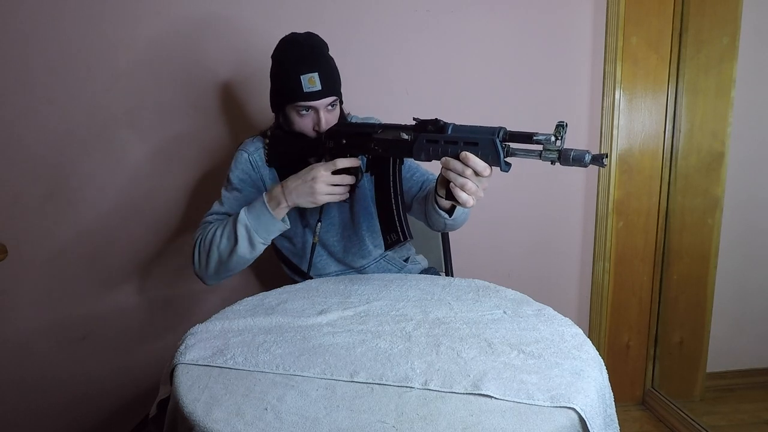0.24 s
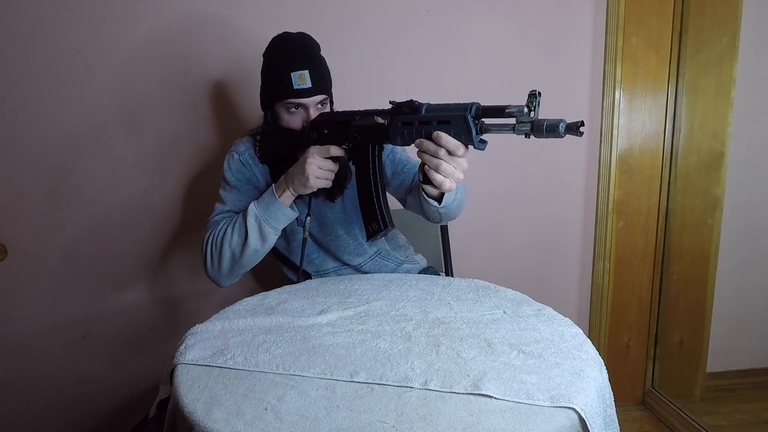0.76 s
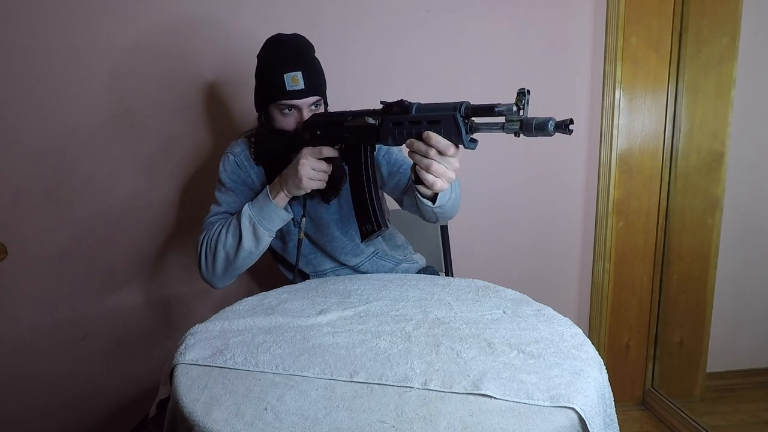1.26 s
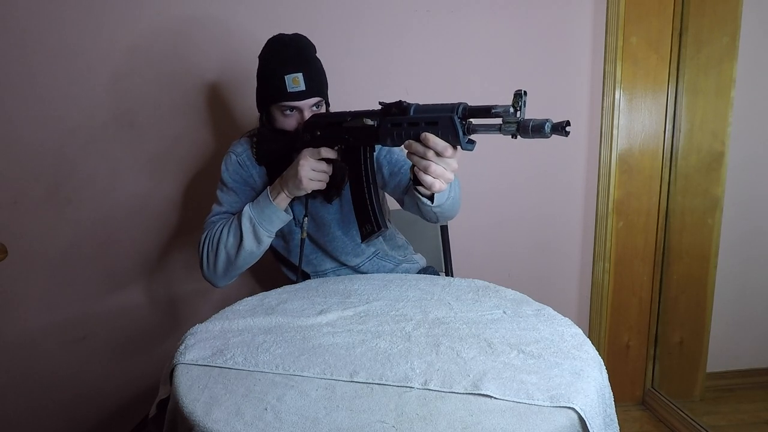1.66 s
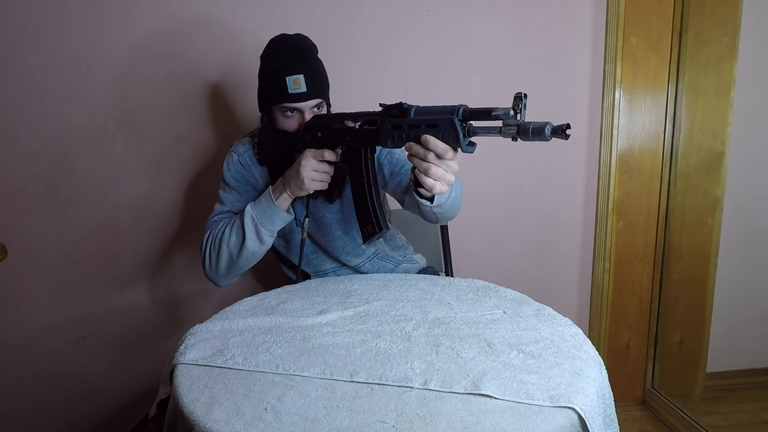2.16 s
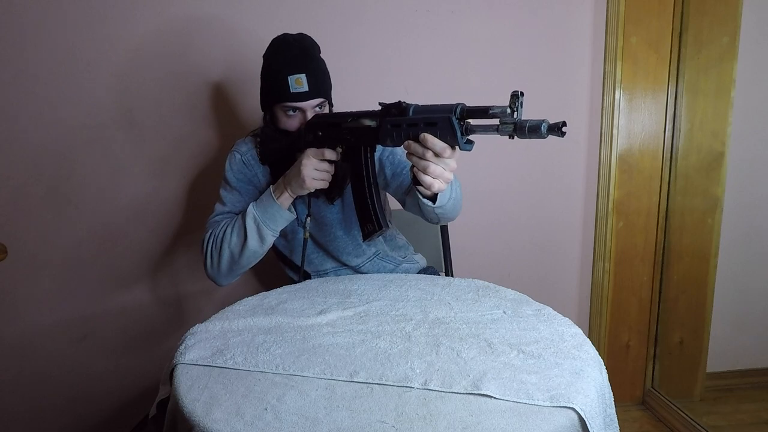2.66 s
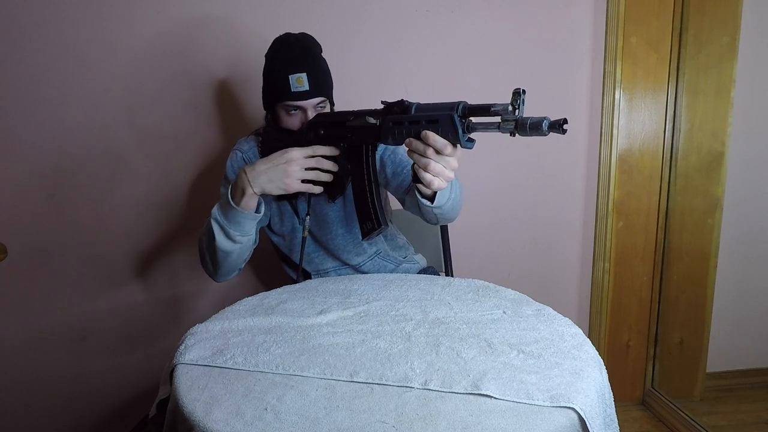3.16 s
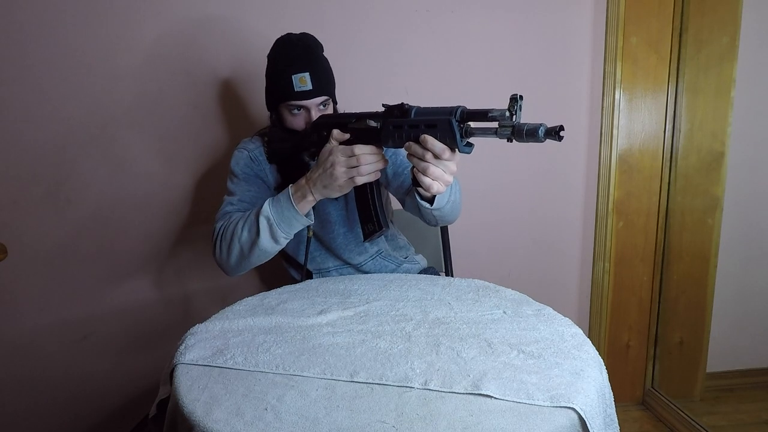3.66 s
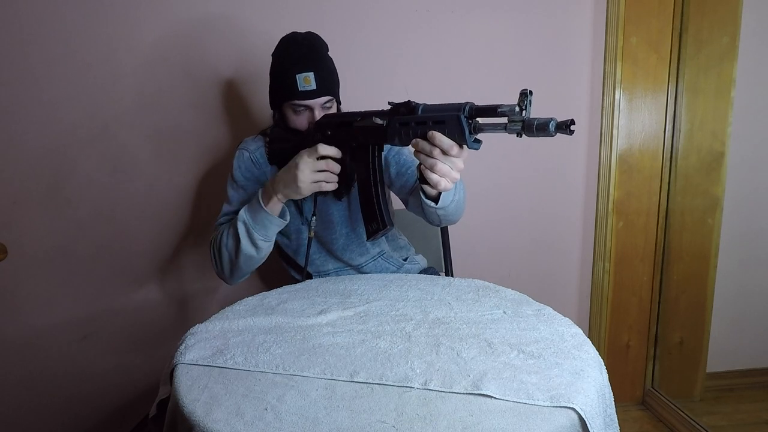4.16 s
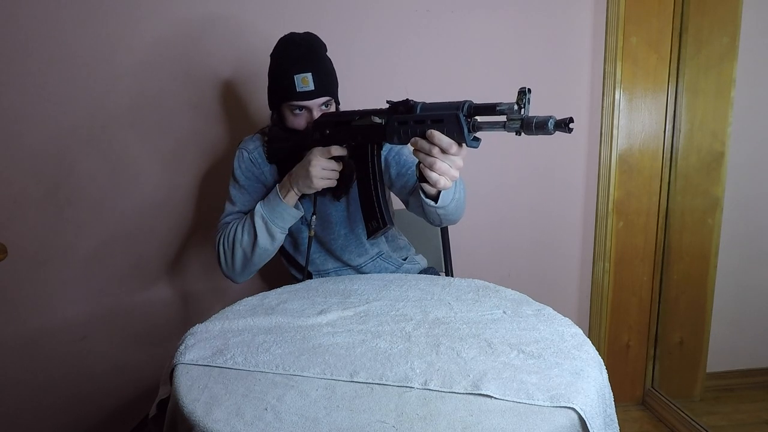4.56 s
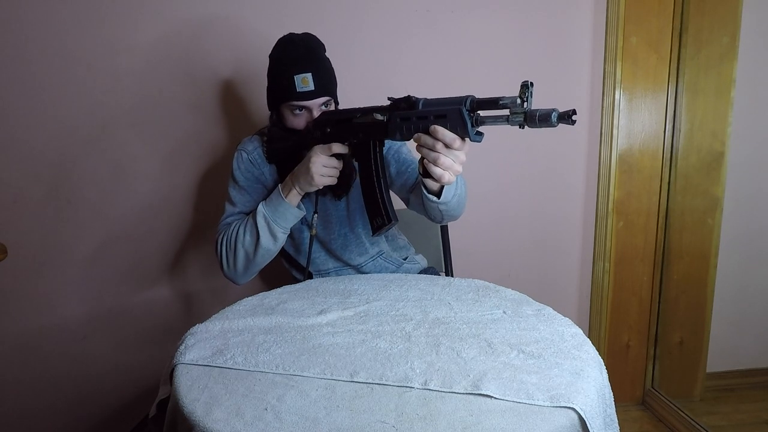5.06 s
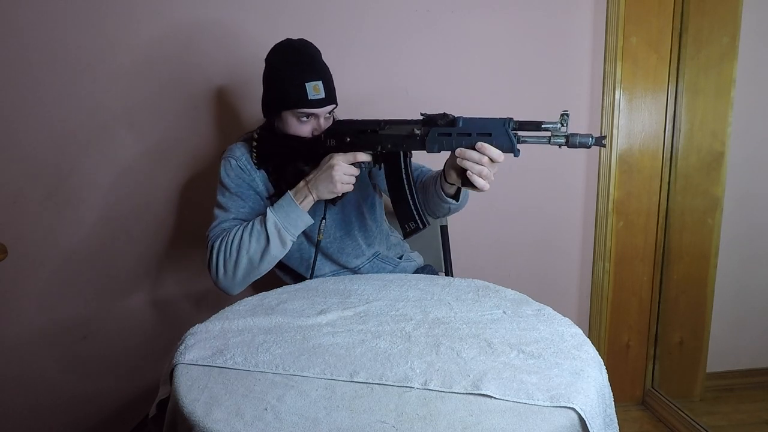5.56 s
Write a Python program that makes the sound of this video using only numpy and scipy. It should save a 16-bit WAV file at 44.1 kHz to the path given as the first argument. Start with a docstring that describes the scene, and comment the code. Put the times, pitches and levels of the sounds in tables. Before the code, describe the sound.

Three quick bursts and four single cracks from an airsoft rifle indoors, its steel bolt clacking, with a selector click in between.

```python
"""A small, bare room with near walls, on a stereo microphone: an airsoft rifle with a moving bolt.
Hands take the grip, three short bursts go off, the selector clicks, and four single shots follow.
Each pull drops the hammer on the valve; each round is a sharp crack, the steel bolt ringing at the back
of its travel and a thud as it shuts. Faint hiss and rumble lie underneath. The recorder's gain control
ducks at the first shot and creeps back, and its bass fills in after the first burst."""
import sys
import numpy as np
from scipy import signal
from scipy.fft import rfft, irfft
from scipy.io import wavfile

SR = 44100
rng = np.random.default_rng(int(sys.argv[2]) if len(sys.argv) > 2 else 0)


def output_pcm(signal):
    """Save a mono or channel-first signal as 16-bit PCM at the path in sys.argv[1].

    Samples are clipped to [-1, 1] before scaling.
    """
    pcm = np.clip(np.atleast_2d(signal).T, -1, 1) * 32767
    wavfile.write(sys.argv[1], SR, np.round(pcm).astype(np.int16))


N = 256220
T = np.arange(SR // 2) / SR  # time within one blow

# pulls of the trigger: first_crack_s, round_count, squeeze_lead_s, hammer_db, crack_db, bolt_db, thump_db
PULLS = [(1.338, 4, .03, -11.5, 11.5, 10, 16), (1.9735, 4, .028, -7.5, 11, 9.5, 6),
         (2.5838, 5, .028, -10.5, 11, 9, 4), (4.631, 1, .043, -7.5, 9.5, 8, 11.5),
         (4.8692, 1, .03, -5, 11.5, 11, 7.5), (5.1032, 1, .03, -6.5, 10.5, 11, 3.5),
         (5.7978, 1, .044, -7, 19.5, 11, 18.5)]
# resonances of the steel bolt: pitch_hz, level_db, t60_s, left_minus_right_db
BOLT_MODES = [(6080, -15, .04, -2), (6045, 1, 0.023, 8.5), (6130, -2.5, 0.037, 14),
              (5900, -12, 0.021, -0.5), (6900, -12, 0.035, -1), (7486, -3, 0.015, -9.5),
              (7490, -1, 0.049, -6)]
# spectrum of steel meeting steel: frequency_hz, level_db
STEEL_COLOUR = [(100, -25), (400, -23.5), (800, -12.5), (2000, -8), (3000, -19), (4200, -4), (5100, -15.5),
                (6000, 1), (7600, -2), (8600, -23.5), (9600, -10), (11000, -36), (16000, -28.5)]
# spectrum of the background hiss and of brushing cloth: frequency_hz, level_db
HISS_COLOUR = [(150, -30.5), (250, 1.5), (519, -6.5), (1180, -12), (1700, -13), (1850, -16), (5440, -19),
               (9010, -20.5), (14400, -34), (16000, -64.5)]


def amp(db):
    """Decibels to gain."""
    return 10 ** (np.asarray(db) / 20)


def read(points, hz):
    """A table's value at a frequency, joined on a log axis."""
    f, value = np.transpose(points)
    return np.interp(np.log(hz + 1), np.log(f + 1), value)


def add(mix, s, sound):
    """Lays a sound into the mix at time s."""
    part = mix[:, max(round(s * SR), 0):][:, :sound.shape[-1]]
    part += sound[..., :part.shape[1]]


def sized(x):
    """Gives a blow the energy of five milliseconds at full level."""
    return x * np.sqrt(.005 * SR / np.mean(np.sum(x ** 2, -1)))


def low_cut(x, hz, order=2):
    """Rolls off the bass below hz."""
    return signal.sosfilt(signal.butter(order, hz, "high", fs=SR, output="sos"), x)


def coloured(x, colour, size=4096):
    """Shapes a blow to a spectrum with a causal filter, at a standard energy."""
    log_gain = np.log(amp(read(colour, abs(np.fft.fftfreq(size, 1 / SR)))))
    minimum_phase = np.exp(np.conj(signal.hilbert(log_gain)))
    taps = np.fft.ifft(minimum_phase).real[:size // 2]
    return sized(signal.fftconvolve(x, taps)[:len(x)])


def contact(chatter_db, chatter_s):
    """One sharp push followed by the dying chatter of loose parts."""
    push = rng.standard_normal(len(T)) * np.exp(-T / chatter_s)
    push *= amp(chatter_db) / np.linalg.norm(push)
    push[0] = -1
    return push


def blow(colour, chatter_db, chatter_s):
    """A contact heard through the spectrum of the part it strikes."""
    return coloured(contact(chatter_db, chatter_s), colour)


def ring(modes, push):
    """A push rings each mode of a part; each mode has its own left-right balance at the microphone."""
    out = np.zeros((2, len(T)))
    for hz, db, t60, side_db in modes:
        mode = amp(-60 * T / t60) * np.sin(2 * np.pi * hz * T)
        driven = signal.fftconvolve(push, mode)[:len(T)]
        sides = amp([[db + side_db / 2], [db - side_db / 2]])
        out += sides * driven * np.linalg.norm(mode) / np.linalg.norm(driven)
    return sized(out)


def noise(colour, likeness):
    """Steady stereo noise of unit level; likeness is the left-right correlation."""
    a, b = rng.standard_normal((2, N))
    pair = np.array([a, likeness * a + np.sqrt(1 - likeness ** 2) * b])
    x = irfft(rfft(pair) * amp(read(colour, np.fft.rfftfreq(N, 1 / SR))), N)
    return x / x.std()


def room(x, wet_db, build_s=.01, spread_s=.0003):
    """Near walls throw single echoes at the microphone; a dense tail builds up and dies band by band."""
    decay = [(150, 0.55), (400, 0.3543), (1000, 0.39), (2700, 0.3519), (6000, 0.3632), (9000, 0.333),
             (15000, 0.2345)]  # reverberation time: frequency_hz, t60_s
    likeness = [(100, 0.56), (300, 0.82), (600, 0.31), (2000, 0.56), (5000, 0.5), (15000, 0.12)]  # how alike the tail is left and right: frequency_hz, correlation
    reflections = [(.0042, -5.5), (.0074, -12.5), (.0088, -7), (0.0133, -9.5), (.017, -13)]  # first echoes off the walls: delay_s, level_db
    # spectrum of the tail: frequency_hz, level_db
    colour = [(100, -15), (300, -5), (700, -2), (3000, .5), (7000, -2), (14000, -1.5)]
    hz, t, (a, b) = signal.stft(rng.standard_normal((2, SR * 3 // 4)), SR, nperseg=256)
    same = read(likeness, hz)[:, None]
    tail = np.array([a, same * a + np.sqrt(1 - same ** 2) * b])
    tail *= amp(-60 * t / read(decay, hz)[:, None])
    tail *= amp(read(colour, hz))[:, None]
    tail *= 1 - np.exp(-(t / build_s) ** 2)
    response = signal.istft(tail, SR, nperseg=256)[1]
    response *= amp(wet_db) / np.linalg.norm(response[0])
    for delay_s, db in reflections:
        arrivals_s = delay_s + spread_s * rng.uniform(-1.06, 1, 2)
        response[[0, 1], np.round(arrivals_s * SR).astype(int)] += amp(db)
    return x + signal.fftconvolve(x, response, axes=1)[:, :N]


def room_tone():
    """A faint hiss and a steady low rumble."""
    rumble = [(59, -68.5), (100, -42.5), (113, -29), (121, -19), (137, -2.5), (156, 5.5), (400, -27.5),
              (520, -48), (880, -120)]  # spectrum of the rumble: frequency_hz, level_db
    return amp(-46) * noise(HISS_COLOUR, likeness=.068) + amp(-45.5) * noise(rumble, likeness=.36)


def sleeves(attack_s=.043, release_s=.12):
    """Sleeves brush the rifle as the hand moves to the grip: each rustle swells, holds and dies away."""
    rustles = [(0, .15, -48.5), (3.9, 0.53, -48)]  # brushes of cloth: start_s, length_s, level_db
    t, level = np.arange(N) / SR, np.zeros(N)
    for s, length_s, db in rustles:
        swell = np.clip((t - s) / attack_s, 0, 1)
        fade = np.exp(-np.maximum(t - s - length_s, 0) / release_s)
        level += amp(db) * swell * fade
    return level * noise(HISS_COLOUR, likeness=.17)


def grip_knocks():
    """The hand knocks on the hollow receiver as it takes the grip."""
    knocks = [(0.0, -26.5), (0.073, -21.5), (0.0784, -14)]  # knocks of the hand: start_s, level_db
    modes = [(864, -1.5, 0.15, 0), (857, 2.5, 0.2, 0.011), (933, -12.5, 0.071, 0.0015),
             (1068, -3.5, 0.44, 0.0078), (1376, -11.5, .05, 0), (1646, -2, .05, 0),
             (1709, 0.5, 0.088, 0.023), (2280, -2, .04, 0.026), (2540, -12, 0.048, 0.018)]  # receiver resonances: pitch_hz, level_db, t60_s, left_minus_right_db
    colour = [(100, -49), (300, -31), (600, -9.5), (840, 13.5), (1250, -6), (1650, 1.5), (2400, -4.5),
              (3600, -16.5), (6500, -13), (15000, -45)]  # spectrum of a knock: frequency_hz, level_db
    out = np.zeros((2, N))
    for s, db in knocks:
        push = contact(chatter_db=4, chatter_s=.015)
        add(out, s, amp(db) * (ring(modes, push) + amp(2.5) * coloured(push, colour)))
    return out


def finger_ticks():
    """Fingers tick on the rifle, each touch peaking at its own pitch."""
    ticks = [(0.265, -32.5, 865), (0.51, -41, 1950), (4.084, -38.5, 990), (4.179, -27, 2010),
             (4.367, -41, 1400), (4.463, -45.5, 1350)]  # touches: start_s, level_db, pitch_hz
    out = np.zeros((2, N))
    for s, db, hz in ticks:
        colour = [(100, -26), (hz / 2, -11), (hz, 0), (hz * 2, -17), (7000, -20), (15000, -40)]
        add(out, s, amp(db) * blow(colour, chatter_db=20, chatter_s=.019))
    return out


def weight_shifts(lean_s=5.46):
    """Dull bumps as the shooter shifts his weight; the floor booms as he leans forward."""
    bumps = [(0.399, -20), (0.53, -26.5), (4.48, -25), (5.45, -6)]  # shifts of weight: start_s, level_db
    bump_colour = [(30, -42), (75, -33.5), (115, -17.5), (165, 20), (240, -18), (400, -17), (1500, -32),
                   (8000, -54.5)]  # spectrum of a bump: frequency_hz, level_db
    floor_colour = [(20, -14), (45, -8.5), (72, 0), (110, -2), (150, -22), (400, -50), (2000, -73)]  # spectrum of the floor's boom: frequency_hz, level_db
    out = np.zeros((2, N))
    add(out, lean_s, amp(-4.5) * blow(floor_colour, chatter_db=17, chatter_s=.09))
    for s, db in bumps:
        add(out, s, amp(db) * blow(bump_colour, chatter_db=19.5, chatter_s=.045))
    return out


def trigger():
    """The steel trigger scrapes softly as it is squeezed."""
    out = np.zeros((2, N))
    for s, _, squeeze_lead_s, *_ in PULLS:
        add(out, s - squeeze_lead_s, amp(-21) * blow(STEEL_COLOUR, chatter_db=19, chatter_s=.013))
    return out


def hammer(lead_s=.018, rebound_s=.0075):
    """Just ahead of each pull's first crack, the hammer pops the valve and rebounds."""
    colour = [(40, -19.5), (150, 3), (400, -9.5), (800, -5.5), (1200, 5.5), (1700, 3.5), (2600, -2),
              (3700, -10), (6000, -9.5), (9000, -19), (16000, -40.5)]  # spectrum of the hammer blow: frequency_hz, level_db
    out = np.zeros((2, N))
    for s, _, _, db, *_ in PULLS:
        fall_s = s - lead_s
        add(out, fall_s, amp(db) * blow(colour, chatter_db=-7, chatter_s=.0025))
        add(out, fall_s + rebound_s, amp(db - 3) * blow(colour, chatter_db=17, chatter_s=.0018))
    return out


def rounds(cycle_s=.07385):
    """The rifle cycles while the trigger is held: start_s, first, last, crack_db, bolt_db, thump_db."""
    for s, count, _, _, crack_db, bolt_db, thump_db in PULLS:
        for k in range(count):
            yield s + k * cycle_s, k == 0, k == count - 1, crack_db, bolt_db, thump_db


def cracks():
    """Each shot cracks, shakes the steel bolt and lets out a low puff of air, a little to the right."""
    crack_colour = [(40, -9.5), (200, 0), (550, -7), (1000, -5.5), (1600, 1), (2700, -10.5), (4300, -4),
                    (5900, -3), (8300, -13), (11000, -9.5), (13000, -20.5), (16000, -35)]  # spectrum of the crack: frequency_hz, level_db
    puff_colour = [(20, -20), (40, -16), (57, 2), (80, -16), (120, -5), (200, -10.5), (500, -43.5),
                   (2000, -68)]  # spectrum of the puff: frequency_hz, level_db
    out = np.zeros((2, N))
    for s, _, _, db, _, _ in rounds():
        push = contact(chatter_db=.5, chatter_s=.0028)
        add(out, s, amp(db) * (coloured(push, crack_colour) + amp(-8.5) * ring(BOLT_MODES, push)))
        puff = blow(puff_colour, chatter_db=9, chatter_s=.013)
        add(out, s, amp(db - 11) * puff * amp([[-2], [2]]))
    return out


def shove(hz, rise_s):
    """A low swing that swells for a moment and rings the body of the rifle."""
    modes = [(206, 5.5, 0.06, -0.2), (280.3, -9, 0.25, 3.5), (167, -8.5, 0.24, -6), (239.2, -7.5, 0.3, 0.5)]  # body resonances: pitch_hz, level_db, t60_s, left_minus_right_db
    return ring(modes, T * np.exp(-T / rise_s) * np.cos(2 * np.pi * hz * T))


def recoil(crack_lead_s=.00067, shut_lead_s=.0048):
    """Every crack shoves the whole rifle with a short low thump; another comes as the bolt shuts and the hammer
    falls for the next round, much weaker after a pull's last round."""
    out = np.zeros((2, N))
    kick, slam = shove(hz=195, rise_s=.00086), shove(hz=187, rise_s=.0037)
    for s, *_, thump_db in rounds():
        add(out, s - crack_lead_s, amp(thump_db) * kick)
    for s, _, thump_db in closings():
        add(out, s - shut_lead_s, amp(thump_db + 4) * slam)
    return out


def back_stops(back_s=.0448, first_back_s=.0425):
    """The bolt hits the back of its travel, sooner and more gently from rest: start_s, level_db."""
    for s, first, _, _, bolt_db, _ in rounds():
        yield s + (first_back_s if first else back_s), bolt_db - 4 * first


def closings(shut_s=.0565, last_shut_s=.0594):
    """The spring drives the bolt home, later on a pull's last round: start_s, clack_db, thump_db."""
    for s, first, last, _, bolt_db, thump_db in rounds():
        clack_db = bolt_db - 2 * first - 3 * last  # softer on the rounds that open and end a pull
        yield s + (last_shut_s if last else shut_s), clack_db, thump_db - 11 * last


def bolt_ring():
    """The steel bolt rings as it chatters against the back stop, and again as it shuts."""
    out = np.zeros((2, N))
    for s, db in back_stops():
        add(out, s, amp(db + 3.5) * ring(BOLT_MODES, contact(chatter_db=2.5, chatter_s=.0054)))
    for s, db, _ in closings():
        add(out, s, amp(db - 1) * ring(BOLT_MODES, contact(chatter_db=13.5, chatter_s=.0059)))
    return out


def bolt_clatter(slide_s=.004):
    """The bolt strikes the back stop, scrapes forward and clacks shut, rattling the receiver."""
    clack_colour = [(40, -16), (200, -11.5), (450, -5), (900, -3), (1550, -0.5), (2500, -5.5), (4000, -10),
                    (6000, -1.5), (8500, -9.5), (11000, -18), (16000, -51.5)]  # spectrum of the closing bolt: frequency_hz, level_db
    out = np.zeros((2, N))
    for s, db in back_stops():
        add(out, s, amp(db - 2.5) * blow(STEEL_COLOUR, chatter_db=13.5, chatter_s=.004))
    for s, db, _ in closings():
        add(out, s - slide_s, amp(db - 5.5) * blow(clack_colour, chatter_db=8, chatter_s=.021))
        add(out, s, amp(db - .5) * blow(clack_colour, chatter_db=0, chatter_s=.0099))
    return out


def selector():
    """The selector lever slides and snaps into its notch, a little left of the microphone."""
    clicks = [(3.811, -17), (3.8254, 2), (3.833, -1)]  # contacts of the lever: start_s, level_db
    colour = [(100, -32), (600, -19), (2000, -14), (5000, -13), (6000, 3), (7600, -6.5), (8800, -11.5),
              (11000, -28), (16000, -40)]  # spectrum of a click: frequency_hz, level_db
    out = np.zeros((2, N))
    for s, db in clicks:
        add(out, s, amp(db) * blow(colour, chatter_db=7, chatter_s=.0036) * amp([[1.3], [-1.3]]))
    return out


def scene():
    """What reaches the microphone: the rifle and hands in the room, sleeves and room tone."""
    shots = room(hammer() + cracks(), wet_db=-1.5)
    bolt = room(bolt_ring(), wet_db=.5) + room(bolt_clatter(), wet_db=3.5)
    levers = room(trigger() + selector(), wet_db=-4)
    handling = room(grip_knocks() + finger_ticks() + weight_shifts(), wet_db=-6)
    body = low_cut(recoil() + levers + handling, hz=70.4)  # small bodies radiate hardly any deep bass
    return shots + bolt + body + room_tone() + sleeves()


def gain_control(x, limit_db=-11, sense_s=.004, recover_db_per_s=12, sense_hz=400):
    """The recorder's gain falls at once when the sound above the bass passes the limit, then creeps up."""
    power = (low_cut(x, sense_hz) ** 2).mean(0)
    keep = np.exp(-1 / (sense_s * SR))
    power_db = 10 * np.log10(signal.lfilter([1 - keep], [1, -keep], power) + 1e-12)
    recovery_db = recover_db_per_s * np.arange(N) / SR
    held_db = np.maximum.accumulate(power_db + recovery_db) - recovery_db
    return x * amp(-np.maximum(held_db - limit_db, 0))


def thin_start(x, cut_hz=124, bass_db=-19, fill_start_s=1.6, fade_s=.3):
    """The recorder's bass is turned down at first and fills in as the first burst dies away."""
    full = np.clip((np.arange(N) / SR - fill_start_s) / fade_s, 0, 1)
    thin = low_cut(x, cut_hz, order=6) + amp(bass_db) * x
    return full * x + (1 - full) * thin


def record(dry):
    """Gain control, a deep rumble at the microphone, the early bass cut, clipping and the band limit."""
    rumble = [(12, -34.5), (20, -2.5), (43, -6.5), (59, -3), (91, -14.5), (110, 4), (140, -30), (240, -120)]  # spectrum of the rumble at the microphone: frequency_hz, level_db
    track = gain_control(dry) + amp(-54) * noise(rumble, likeness=.24)
    clipped = np.clip(thin_start(track), -1, 1)
    band_limit = signal.firwin(255, 15600, window=("kaiser", 8), fs=SR)
    return signal.oaconvolve(clipped, band_limit[None], "same")


dry = scene()
out = record(dry)
output_pcm(out)
```